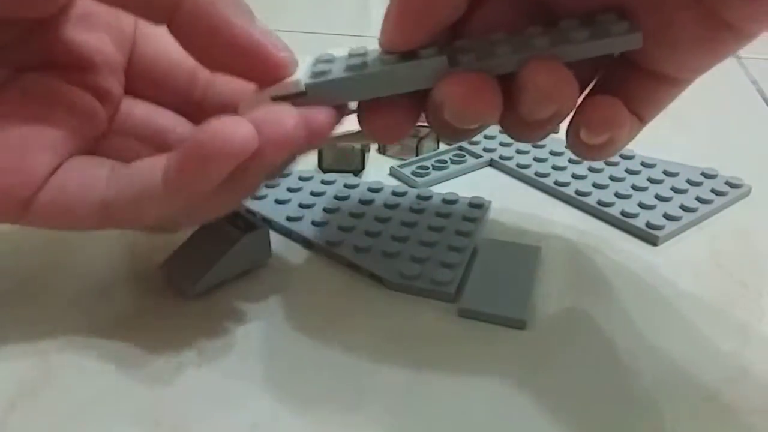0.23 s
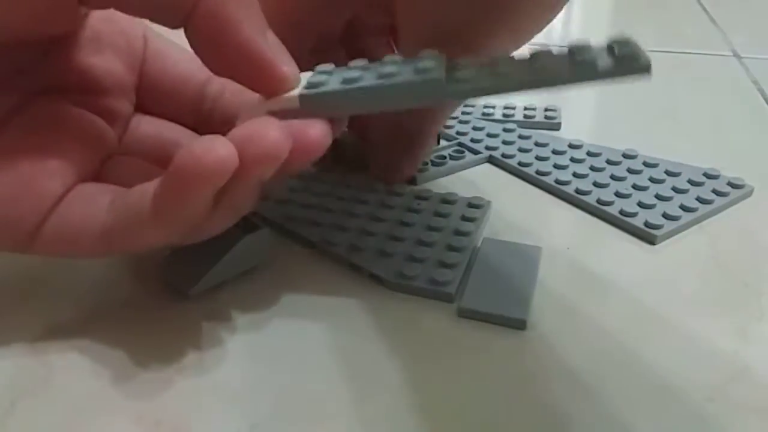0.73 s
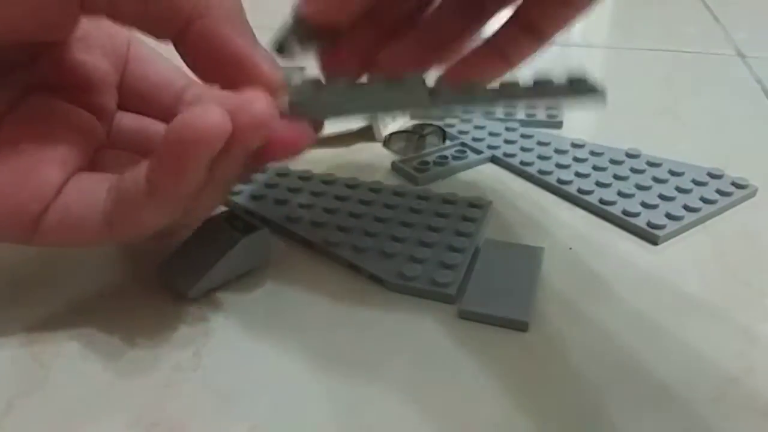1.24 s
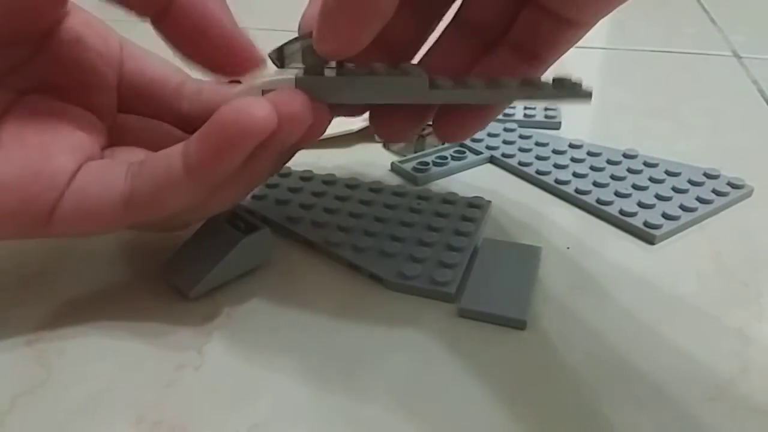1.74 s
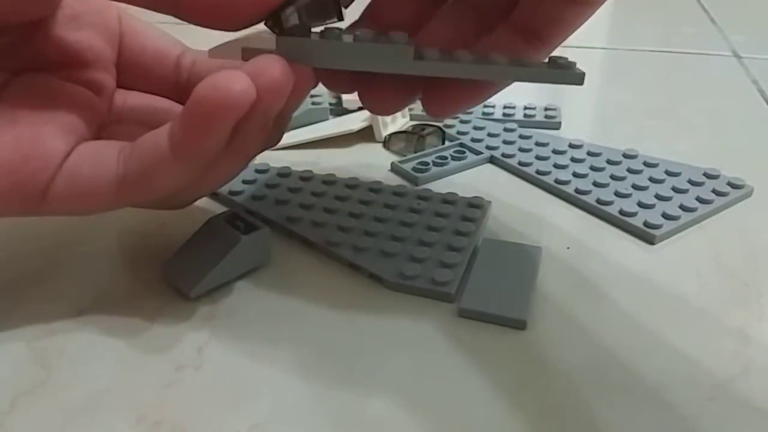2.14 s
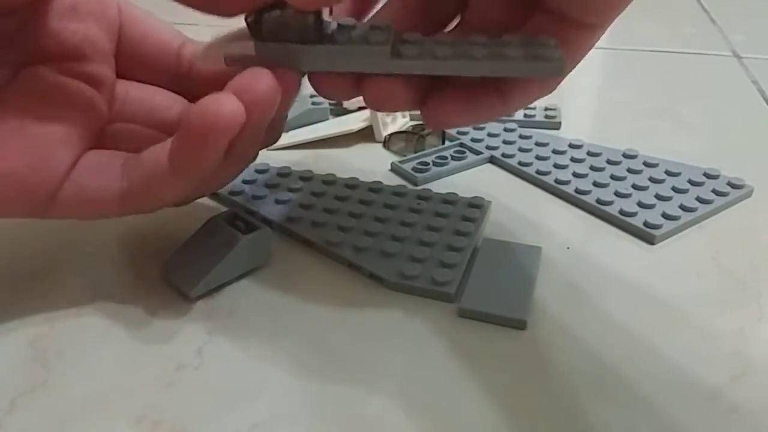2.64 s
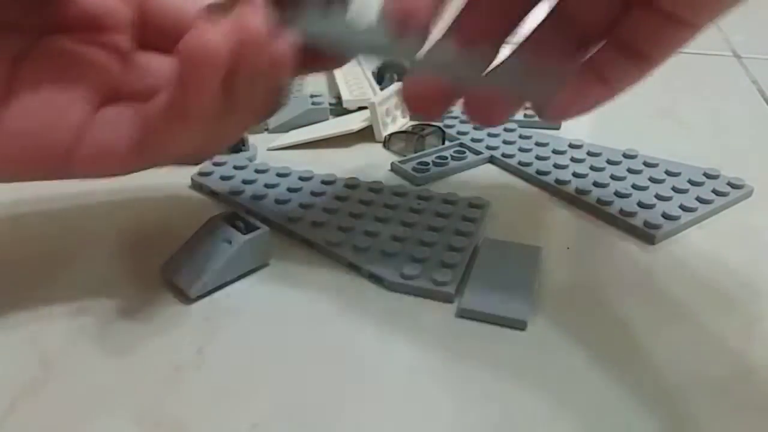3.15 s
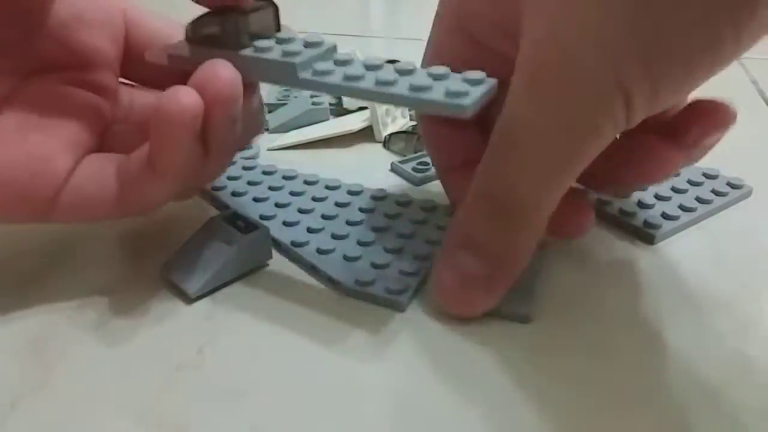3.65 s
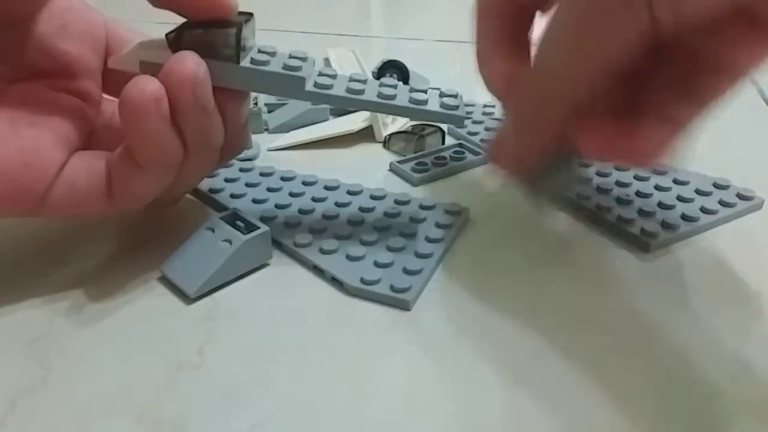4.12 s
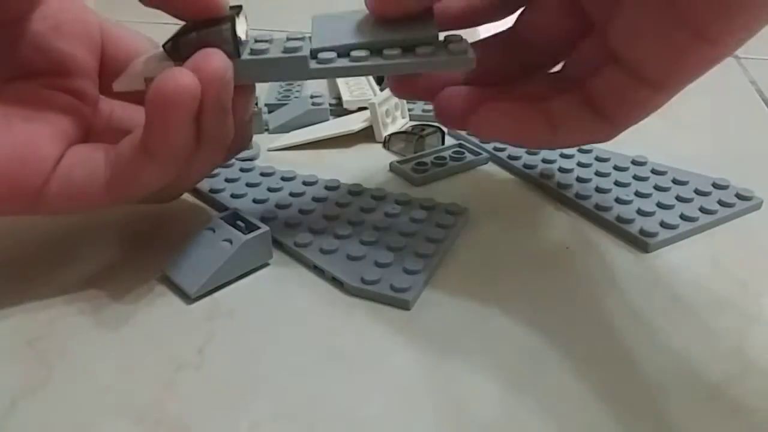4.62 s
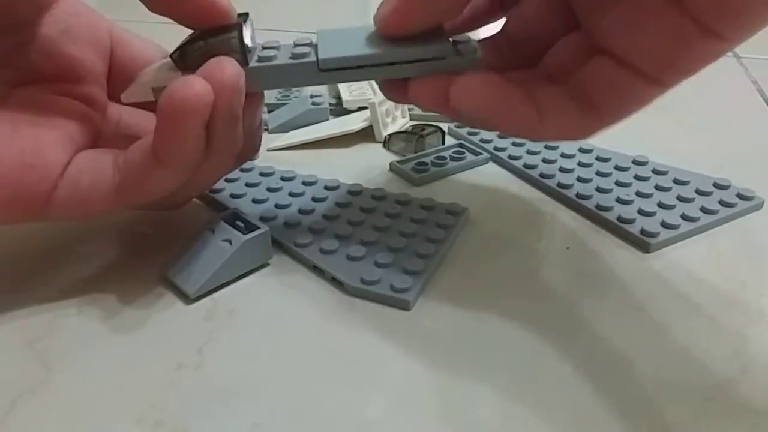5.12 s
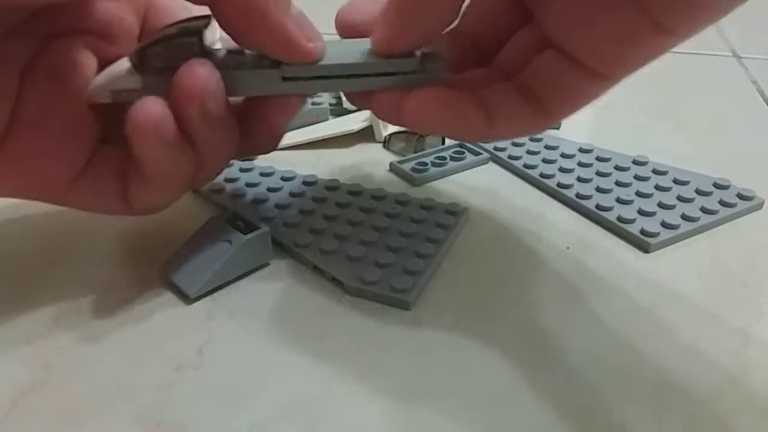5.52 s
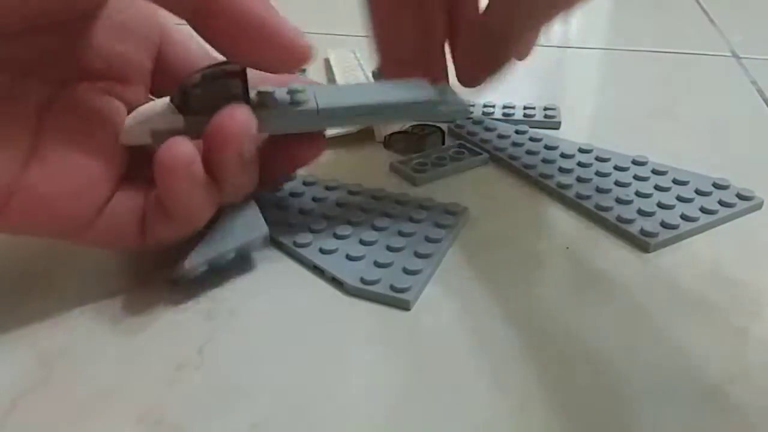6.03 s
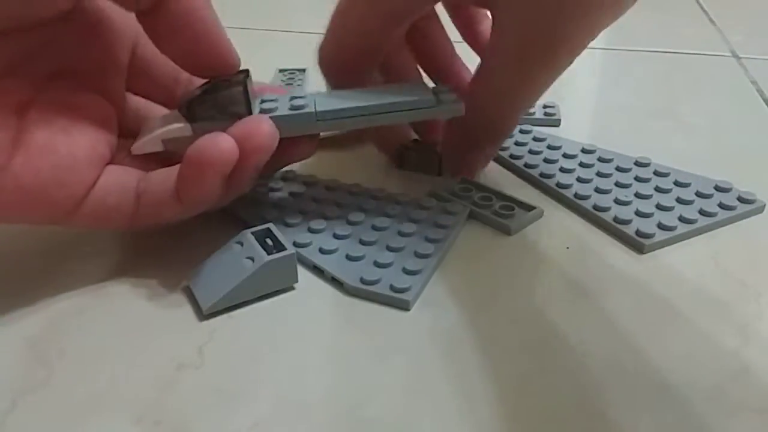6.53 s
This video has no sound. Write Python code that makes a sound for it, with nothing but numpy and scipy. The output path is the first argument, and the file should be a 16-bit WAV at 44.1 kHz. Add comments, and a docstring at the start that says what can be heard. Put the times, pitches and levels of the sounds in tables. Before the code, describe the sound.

Small plastic building bricks are handled close to a stereo microphone in a hard room with a short echo. A crisp click opens, then a loud snap with a soft thump at 0.5 seconds, followed by light knocks of loose pieces. After a click at 1.3 seconds, a tight brick creaks in small ticks from 1.6 to 2 seconds. It is nearly quiet until about 3.5 seconds, when loose plates knock and slide on the tiled floor for half a second. More clicks start at 4.5 seconds, building to a loud snap at 5.2. From about 6.1 seconds pieces clatter, and a small one drops and bounces in quick, bright, ringing cracks, with a few faint taps until 6.6. A faint low fan hum runs throughout, and a distant motor drones softly outside for the first two and a half seconds.

```python
"""Plastic bricks on a tiled floor

Two hands build a small model close to a stereo pair of microphones. Studs snap and creak home between
the fingers, loose plates knock and slide on the floor, and near the end a small piece drops and bounces.
The hard room answers each click and a fan hums; a motor drones far outside for the first seconds."""
import sys
import numpy as np
from scipy import signal
from scipy.fft import rfft, irfft, next_fast_len
from scipy.io import wavfile
from scipy.ndimage import uniform_filter1d

SR = 44100
rng = np.random.default_rng(int(sys.argv[2]) if len(sys.argv) > 2 else 0)


def unload_wav(signal):
    """Save mono or channel-first audio to the path in sys.argv[1] as 16-bit WAV at rate SR, clipped to [-1, 1]."""
    wavfile.write(
        sys.argv[1],
        SR,
        np.round(np.clip(np.atleast_2d(signal).T, -1, 1) * 32767).astype(np.int16),
    )


N = 298557
TIME = np.arange(N) / SR
SIZE = 4096
FREQ = np.fft.rfftfreq(SIZE, 1 / SR)
CLICK_S = .005  # click and thump levels are their energy spread over this time

# Studs seating, and a tight stud slipping: start_s, level_db, pitch_hz, focus_db_per_octave
STUD_SNAPS = [(0.0155, -32, 8330, 5.5), (0.0199, -38, 7840, 8), (.3348, -61, 7400, 12),
              (.3621, -58.5, 11670, 11.5), (.5433, -20, 6480, 8), (1.2906, -39, 5100, 5),
              (1.3124, -50, 12500, 1.1), (1.4888, -62, 4090, 2.5), (2.9776, -64.5, 8100, 3),
              (3.1006, -63.5, 11740, 11.5), (4.4753, -39, 9600, 10), (4.497, -50, 6400, 5.5),
              (4.8579, -59, 5000, 2), (4.966, -51.5, 7410, 5), (4.9815, -51, 7100, 5.5),
              (4.993, -50.5, 7025, 2.5), (5.0586, -32.5, 9070, 9.5), (5.0952, -46, 7000, 9),
              (5.1566, -34, 7905, 17), (5.198, -18, 8300, 13.5), (5.8513, -52, 8250, 8),
              (5.8595, -48, 12040, 11.5)]
STUD_SLIPS = [(1.6027, -43, 5200, 12.5), (1.6432, -34, 5400, 8.5), (1.7461, -40.5, 5630, 20),
              (1.8383, -50, 5700, 21), (1.8976, -52.5, 5400, 18), (1.9082, -48.5, 5760, 24),
              (1.9354, -44.5, 5730, 25), (2.0467, -54.5, 4900, 15)]
# Loose plates knocking, and a small piece bouncing on the floor and being picked up:
# start_s, level_db, pitch_hz, focus_db_per_octave, ring_s, pan_db (always left minus right)
PLATE_KNOCKS = [(.6829, -44.5, 7900, 10, 0.0078, 1), (.6973, -38.5, 6240, 16.5, 0.021, -7),
                (.7187, -47, 5340, 9.5, 0.12, -21.5), (.7229, -43.5, 2090, 3, 0.014, 11),
                (.7279, -44.5, 2050, 4.5, 0.0073, 12), (.7628, -46, 2330, 4.5, 0.028, -6),
                (3.5357, -41.5, 1730, 5.5, 0.013, 5), (3.5429, -44.5, 1510, 5, 0.032, 0.5),
                (3.5613, -50, 1650, 3, 0.098, 5), (3.5885, -36, 3200, 7.5, 0.02, 0),
                (3.5892, -38, 6600, 23, .007, 11.5), (3.6376, -36, 3740, 10, 0.021, 2.5),
                (3.7596, -54.5, 1810, 5, 0.018, 3), (3.7722, -42.5, 5360, 19, 0.0027, 4.5),
                (3.8138, -51.5, 6600, 20.5, 0.0091, 12), (3.8439, -51, 2120, 5.5, 0.028, -5),
                (3.9176, -38.5, 2180, 5, 0.029, -2), (6.0815, -35, 7800, 5.5, 0.023, -1),
                (6.0951, -40.5, 8500, 4, 0.042, 4), (6.1495, -47, 2530, 6, 0.027, 3),
                (6.1596, -43.5, 2400, 6, 0.015, 3), (6.1685, -51, 4200, 12, .012, 2),
                (6.1965, -40, 4540, 18, 0.01, -1), (6.2085, -33.5, 3900, 10, .012, 0.5),
                (6.2136, -29, 2560, 4.5, 0.015, 3), (6.2252, -42, 1850, 5.5, .012, -5.5),
                (6.331, -63, 1880, -2, .03, 6), (6.3724, -43.5, 3750, 18, .018, 9.5),
                (6.3727, -51, 7900, 18, .005, 5), (6.5581, -58.5, 2930, 4.5, 0.0065, 7)]
PIECE_BOUNCES = [(6.2005, -40, 6200, 8.5, .005, 0.5), (6.202, -18, 6130, 11.5, 0.012, -2.5),
                 (6.209, -36.5, 8365, 19, .03, 4.5), (6.2138, -24, 11460, 12, .018, 8.5),
                 (6.237, -21, 5650, 11, 0.01, -3), (6.2465, -32, 5660, 7.5, .008, 3),
                 (6.2541, -34, 5560, 17, .0077, 8.5), (6.2602, -38.5, 5900, 5, .012, -2),
                 (6.2635, -25.5, 6860, 10.5, .012, 0), (6.5326, -48, 11380, 3.5, 0.01, 0)]
# Low thuds: plates seating against the hollow of the hand, and the low body of a knock on the floor as the
# small piece lands: start_s, level_db, cutoff_hz
LOW_THUDS = [(0.5429, -38, 498), (5.198, -58, 176.5), (6.2136, -53, 656)]
# Pieces ringing free of a contact, and a faint long ring near 3.7 kHz after the knock at 3.64 s: start_s,
# level_db, pitch_hz, t60_s, pan_db
FREE_PINGS = [(3.6376, -30.5, 3610, 0.043, -6), (3.64, -57, 3700, 0.34, 4), (6.202, -25.5, 5680, .03, -1),
              (6.215, -23.5, 11260, 0.022, 6), (6.236, -20, 5650, 0.061, 1), (6.2625, -26, 5670, .03, 0),
              (6.2637, -22.5, 6950, .02, -3), (6.5326, -49, 14200, 0.022, 0)]
# Plastic and fingertips sliding: start_s, length_s, level_db, resonance_hz
SLIDES = [(3.342, 0.039, -64.5, 8000), (3.343, 0.033, -79, 2110), (3.526, .11, -65, 2450),
          (3.737, 0.096, -70, 2020), (3.776, 0.074, -68, 5700), (3.877, 0.076, -61.5, 2250),
          (3.882, 0.061, -65, 5500), (3.918, .21, -74, 464), (3.962, 0.068, -67.5, 8200),
          (4.128, .1, -81, 11900), (4.96, .048, -62.5, 6500), (5.468, 0.023, -77, 10000),
          (5.825, 0.043, -66.5, 10530), (6.136, 0.059, -55, 3400), (6.206, 0.034, -47.5, 2730)]
# Resonances of each body: pitch_hz, width_hz, gain_db
HELD_PLATE_MODES = [(2823, 800, 1.5), (3997, 480, -4), (5018, 400, 2), (6160, 300, -3.5), (6850, 230, -6),
                    (7700, 720, -4), (8500, 400, -4.5)]
CANOPY_BRICK_MODES = [(2370, 610, 7), (3858, 430, 4.5), (5170, 380, 9.5), (6080, 270, 10.5),
                      (7600, 280, -14), (9700, 520, 7.5), (12800, 1400, 14)]
SMOOTH_TILE_MODES = [(3750, 497, -4.5), (4500, 300, -6), (5200, 470, -5.5), (7300, 240, 2.5),
                     (8030, 470, 1), (9320, 160, 12.5), (12650, 350, 5)]  # the plastic tile that tops the model
LOOSE_PLATE_MODES = [(1176, 110, 4), (1370, 120, -2), (1843, 140, 7), (2066, 210, 6), (2840, 230, 6),
                     (3235, 240, 4.5), (3810, 510, 5), (5936, 190, 4), (6690, 220, 5.5), (7450, 350, 2.5),
                     (9600, 210, 0), (11200, 600, 0.5)]
SMALL_PIECE_MODES = [(3920, 200, 6), (4516, 220, 6), (5645, 130, 6), (5916, 160, -1), (6550, 250, 3),
                     (6860, 160, 1), (8365, 120, 3), (9220, 250, 1), (11300, 420, 9), (12350, 280, 8),
                     (13920, 300, 6), (14350, 400, 8)]
THUD_MODES = [(232, 95, 1.5), (307, 100, -1.5), (470, 57, 4)]
# Bounds of the four bands that colour a click: edge_hz
BAND_EDGES = [800, 3000, 6500, 10000, 16000]
# Where the fingers work, as the left microphone's head start: time_s, lead_s
LEFT_LEAD = [(0, .00012), (3.9, .0001), (4.5, -.00007), (5.2, -.00036), (5.8, .00011), (6.4, .00011),
             (6.55, 0)]
# Colour of the room's tail: frequency_hz, gain_db
TAIL_COLOUR = [(200, -1), (1000, 6.5), (2500, -2.5), (7000, -2), (9000, -3.5), (11500, 1), (16000, -5.5)]
# Decay of the room's tail: frequency_hz, t60_s
TAIL_DECAY = [(200, .48), (2000, .42), (5500, .42), (8500, .4), (11500, .33), (15000, .28)]
# Hum of the fan's motor: pitch_hz, level_db
FAN_HUM = [(120.15, -63.5), (240.3, -94), (279, -83.5)]
# The motor outside: time_s, firing_hz, level_db
MOTOR_RUN = [(0, 91.1, -60), (.45, 89, -70), (.75, 81, -64), (1.3, 80.5, -70), (1.651, 80.7, -66),
             (1.9, 82.6, -69.5), (2.2, 84, -67), (2.5, 83.6, -88)]
# Its harmonics: multiple, relative_db
MOTOR_HARMONICS = [(2, 9.5), (3, -5.5), (4, -14.5), (5, -3.5), (6, -22)]
# Spectrum of the room's still air: frequency_hz, relative_db
AIR_COLOUR = [(25, -25.5), (40, -15), (75, -15), (104, -13.5), (140, -12), (190, -18.5), (280, -23),
              (490, -29.5), (650, -37), (1000, -38), (3000, -41.5), (16000, -43)]


def stud_snaps(modes, from_s, until_s):
    """Studs seat between fingers that damp them all alike, louder at the nearer microphone."""
    contacts = []
    for start_s, db, hz, focus in STUD_SNAPS:
        if from_s <= start_s < until_s:
            lead_ms = 1000 * left_lead_s(start_s)
            pan_db = 2 + 11.5 * lead_ms
            contacts.append((start_s, db, hz, focus, .0087, pan_db))
    return clicks(contacts, modes, width_hz=1800, resonance_db=1.5, ring_scale=1.3,
                  crack_db=-6.5, bass_hz=2567, treble_slope=1.7, dull_hz=16000)


def stud_creaks(ring_s=.0076, pan_db=1):
    """A tight stud of the canopy sticks and slips, each slip a crisp tick in the same few modes."""
    slips = [(*slip, ring_s, pan_db) for slip in STUD_SLIPS]
    return clicks(slips, CANOPY_BRICK_MODES, width_hz=390, resonance_db=1.5, ring_scale=.96,
                  crack_db=-12, bass_hz=2600, treble_slope=1.7, dull_hz=14400)


def plate_knocks():
    """Loose plates ring as they strike the floor and each other."""
    return clicks(PLATE_KNOCKS, LOOSE_PLATE_MODES, width_hz=180, resonance_db=6, ring_scale=1.2,
                  crack_db=2, bass_hz=1200, treble_slope=1.65, dull_hz=12000)


def piece_bounces():
    """A small piece hits the hard floor in a quick run of bright cracks."""
    return clicks(PIECE_BOUNCES, SMALL_PIECE_MODES, width_hz=200, resonance_db=-3, ring_scale=1.1,
                  crack_db=4, bass_hz=1500, treble_slope=.85, dull_hz=16000)


def clicks(contacts, modes, width_hz, resonance_db, ring_scale, crack_db, bass_hz, treble_slope, dull_hz):
    """Each contact is a sharp crack and a fast-dying shiver of plastic, coloured by the piece's modes."""
    out, t = np.zeros((2, N)), np.arange(SIZE) / SR
    centres = np.sqrt(np.multiply(BAND_EDGES[:-1], BAND_EDGES[1:]))
    bands = [(FREQ >= low) & (FREQ < high) for low, high in zip(BAND_EDGES, BAND_EDGES[1:])]
    crack = undb(crack_db) * np.exp(-t / .00015)
    margin = SIZE // 64  # samples kept ahead of the attack
    for start_s, db, hz, focus, ring_s, pan_db in contacts:
        shiver = decay(t, ring_scale * ring_s)
        spectrum = rfft(stereo_noise(SIZE, .8) * (shiver + crack))
        # a hard contact drives all pitches evenly
        spectrum /= np.sqrt(uniform_filter1d(abs(spectrum) ** 2, size=45))
        spectrum *= 1 + resonance(FREQ, modes)
        spectrum *= 1.5 + resonance(FREQ, [(hz, width_hz, resonance_db)])
        spectrum *= (1j * FREQ / (bass_hz + 1j * FREQ)) ** 2  # small parts radiate little bass
        spectrum /= 1 + (FREQ / dull_hz) ** 8
        # bands fall away from the pitch by the focus; softer contacts lose the treble faster
        octaves = np.log2(centres / hz)
        bands_db = db - focus * np.maximum(-octaves, treble_slope * octaves)
        for side in (0, 1, 0, 1):  # two passes a side settle the band levels
            energy = np.array([np.sum(abs(spectrum[side, band]) ** 2) for band in bands])
            lift_db = bands_db - 10 * np.log10(2 * energy / (SIZE * CLICK_S * SR))
            spectrum[side] *= undb(curve(FREQ, np.column_stack([centres, lift_db])))
        spectrum[1] *= np.exp(-2j * np.pi * FREQ * left_lead_s(start_s))
        click = np.roll(irfft(spectrum), margin, axis=1)[:, :SIZE // 2]
        add(out, start_s - margin / SR, click * pan(pan_db))
    return out


def pings(rise_s=.0004):
    """A piece springs free of its contact and rings on in a single mode; after one knock a faint tone lingers
    long."""
    out, t = np.zeros((2, N)), np.arange(4 * SIZE) / SR
    for start_s, db, hz, t60_s, pan_db in FREE_PINGS:
        delay_s = np.array([[0], [left_lead_s(start_s)]])
        tone = np.sin(2 * np.pi * hz * (t - delay_s))
        envelope = decay(t, t60_s) * (1 - np.exp(-t / rise_s))
        add(out, start_s, tone * envelope * undb(db) * pan(pan_db))
    return out


def low_thuds(pan_db=7):
    """A short push or knock rings a low, hollow body; a softer contact is duller."""
    out = np.zeros((2, N))
    for start_s, db, cutoff_hz in LOW_THUDS:
        contact = 1 / (1 + 1j * FREQ / cutoff_hz - (FREQ / cutoff_hz) ** 2)
        thud = irfft(resonance(FREQ, THUD_MODES) * contact)
        thud *= np.sqrt(CLICK_S * SR / np.sum(thud ** 2))
        add(out, start_s, thud * undb(db) * pan(pan_db))
    return out


def scrapes(grain_db=3, catches_per_s=500, width_share=.45):
    """Sliding edges and fingertips rub finely and catch on grit in tiny slips that ring the plates."""
    out, span = np.zeros((2, N)), 2 * SIZE
    for start_s, length_s, db, hz in SLIDES:
        n = int(length_s * SR)
        catches = rng.random(span) < catches_per_s / SR
        strength = undb(grain_db * np.minimum(rng.exponential(size=span), 3))
        friction = stereo_noise(span, .5) * (.18 + catches * strength)
        stroke = np.sin(np.pi * np.minimum(np.arange(span) / n, 1))
        scrape = tint(friction * stroke,
                      lambda f: peak(f, hz, width_share * hz) * (1 + resonance(f, LOOSE_PLATE_MODES)))
        add(out, start_s, at_level(scrape, db) * np.sqrt(n / span))
    return out


def room(dry, tail_db=-14, near_db=-19, ceiling_db=-21, ceiling_s=.0162, build_s=.011):
    """Nearby things scatter at once, the ceiling answers next, then the hard walls ring on."""
    t = np.arange(int(.7 * SR)) / SR
    noise, tail = stereo_noise(len(t), .061), 0
    centres = np.geomspace(150, 16000, num=10)
    for hz, weights in zip(centres, np.eye(len(centres))):
        band_shape = np.column_stack([centres, weights])
        band = tint(noise, lambda f: curve(f, band_shape) * undb(curve(f, TAIL_COLOUR)))
        tail = tail + band * decay(t, curve(hz, TAIL_DECAY))
    tail *= np.where(t < build_s, .45, 1) * (t > .003)
    near = stereo_noise(len(t), .1) * np.exp(-t / .005) * (t > .001)
    ceiling = stereo_noise(len(t), .22) * np.exp(-abs(t - ceiling_s) / .0027) * (t > ceiling_s)
    response = at_level(tail, tail_db) + at_level(near, near_db) + at_level(ceiling, ceiling_db)
    return signal.fftconvolve(dry, response / np.sqrt(len(t)), axes=1)[:, :N]


def fan(turn_hz=2.9, sway_depth=.35, flutter_db=-70):
    """The fan's motor hums; the turning blades make the hum sway and add a low flutter."""
    hum = sum(undb(db) * np.sqrt(2) * np.sin(2 * np.pi * (hz * TIME + rng.random()))
              for hz, db in FAN_HUM)
    sway = 1 + sway_depth * np.sin(2 * np.pi * turn_hz * TIME)
    flutter = tint(stereo_noise(N, .98), lambda f: peak(f, hz=128, width_hz=16))
    return hum * sway + at_level(flutter, flutter_db)


def far_motor(waver=.86):
    """From far outside, only a motor's wavering low harmonics and a dull rumble pass the walls."""
    times, firing_hz, db = np.transpose(MOTOR_RUN)
    cycles = np.cumsum(np.interp(TIME, times, firing_hz)) / SR
    noise = rng.standard_normal((len(MOTOR_HARMONICS), N))
    drifts = at_level(tint(noise, lambda f: np.exp(-(f / 5) ** 2)), 0)
    drone = sum(undb(gain_db) * (1 + waver * drift) * np.sin(2 * np.pi * multiple * cycles + drift)
                for (multiple, gain_db), drift in zip(MOTOR_HARMONICS, drifts))
    rumble = tint(stereo_noise(N, .61), lambda f: peak(f, hz=250, width_hz=220))
    return (at_level(drone, 0) + at_level(rumble, -3)) * undb(np.interp(TIME, times, db))


def room_air(level_db=-68, split_hz=600):
    """Low rumble, alike at both microphones, under a thin wide hiss."""
    rumble = tint(stereo_noise(N, .83), lambda f: undb(curve(f, AIR_COLOUR)) / np.hypot(1, f / split_hz))
    hiss = tint(stereo_noise(N, .042), lambda f: undb(curve(f, AIR_COLOUR)) * f / np.hypot(split_hz, f))
    return at_level(rumble + hiss, level_db)


def left_lead_s(time_s):
    """How much sooner the left microphone hears the hands."""
    return np.interp(time_s, *np.transpose(LEFT_LEAD))


def pan(db):
    """Left and right gains, db apart."""
    return undb([[db / 2], [-db / 2]])


def undb(db):
    """Decibels to gain."""
    return 10 ** (np.asarray(db) / 20)


def at_level(x, db):
    """Scale to an rms level."""
    return x * undb(db) / np.sqrt(np.mean(x ** 2))


def decay(t, t60_s):
    """Fall by 60 dB in t60_s."""
    return np.exp(-np.log(1000) * t / t60_s)


def curve(f, points):
    """Read (frequency_hz, value) points on a log-frequency axis."""
    hz, values = np.transpose(points)
    return np.interp(np.log(f + 1), np.log(hz), values)


def tint(x, response):
    """Filter by a response given as a function of frequency."""
    n = next_fast_len(x.shape[-1])
    return irfft(rfft(x, n) * response(np.fft.rfftfreq(n, 1 / SR)), n)[..., :x.shape[-1]]


def resonance(f, modes):
    """Summed response of damped modes."""
    return sum(undb(db) * 1j * f * width / (hz ** 2 - f ** 2 + 1j * f * width) for hz, width, db in modes)


def peak(f, hz, width_hz):
    """One resonance applied twice, for steep sides."""
    return resonance(f, [(hz, width_hz, 0)]) ** 2


def stereo_noise(size, correlation):
    """Left and right noise with a given correlation."""
    mid, side = rng.standard_normal((2, size))
    spread = np.sqrt(1 - correlation) * side * np.array([[1], [-1]])
    return (np.sqrt(1 + correlation) * mid + spread) / np.sqrt(2)


def add(out, start_s, sound):
    """Mix a sound in at a time."""
    i = max(int(start_s * SR), 0)
    out[:, i:i + sound.shape[1]] += sound[:, :N - i]


def scene(canopy_from_s=1.2, tile_from_s=4.3):
    """Close up, plate goes on plate, then the canopy, then a smooth tile; the room lies behind."""
    floor = plate_knocks() + piece_bounces() + pings() + scrapes()
    plates = stud_snaps(HELD_PLATE_MODES, 0, canopy_from_s)
    canopy = stud_snaps(CANOPY_BRICK_MODES, canopy_from_s, tile_from_s)
    tile = stud_snaps(SMOOTH_TILE_MODES, tile_from_s, np.inf)
    grip = canopy + stud_creaks() + low_thuds()
    echoes = room(undb(2.5) * plates + undb(-.5) * tile + undb(.5) * grip + undb(-1) * floor)
    return plates + tile + grip + floor + echoes + fan() + room_air() + far_motor()


def record(dry, low_cut_hz=34, top_hz=16000):
    """The recorder cuts the deepest rumble and the highest treble."""
    low_cut = signal.butter(4, low_cut_hz, "highpass", fs=SR, output="sos")
    high_cut = signal.ellip(10, .2, 70, top_hz, fs=SR, output="sos")
    return signal.sosfilt(high_cut, signal.sosfilt(low_cut, dry))


dry = scene()
out = record(dry)
unload_wav(out)
```